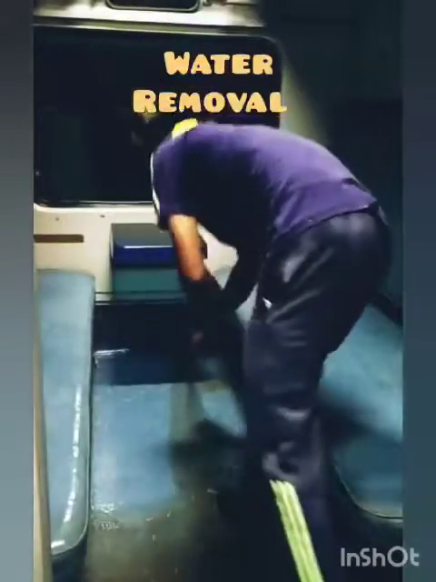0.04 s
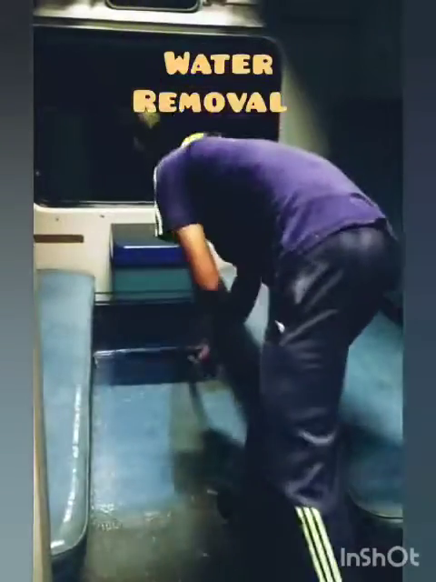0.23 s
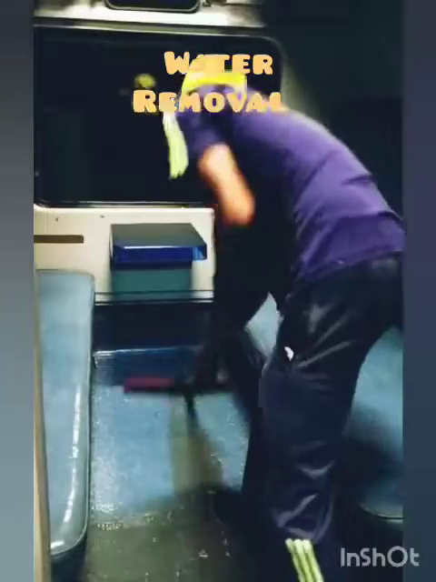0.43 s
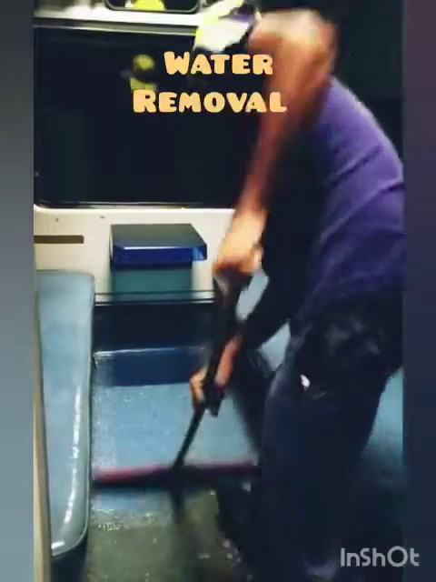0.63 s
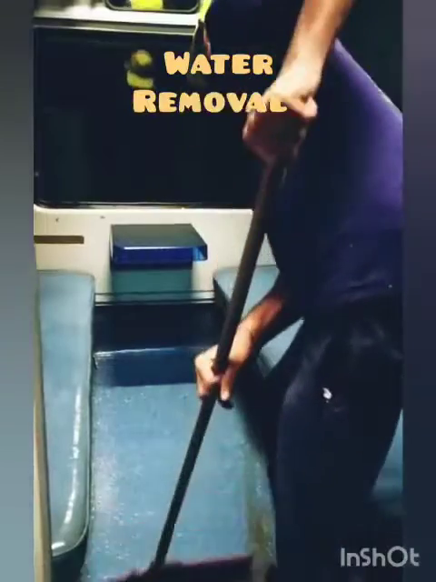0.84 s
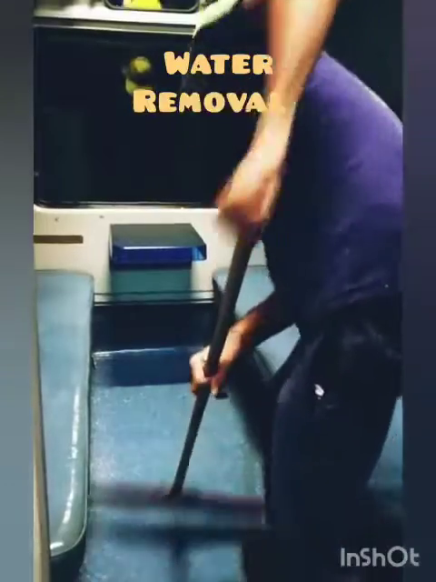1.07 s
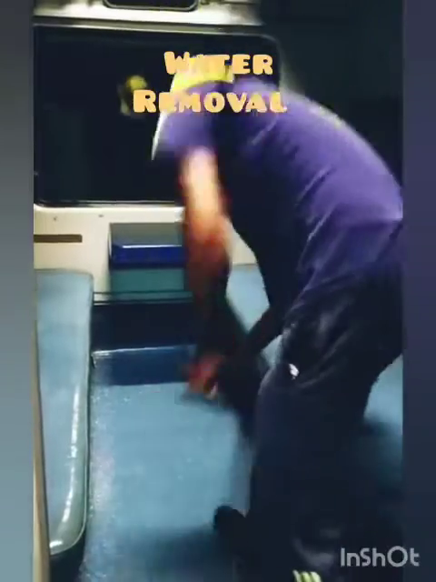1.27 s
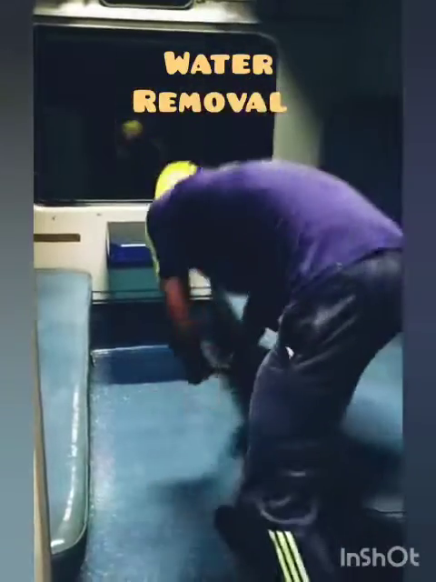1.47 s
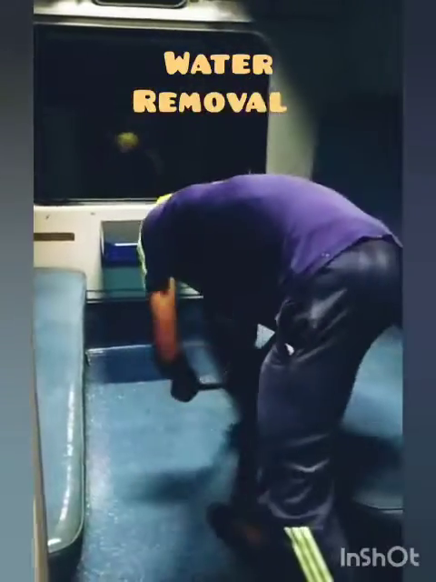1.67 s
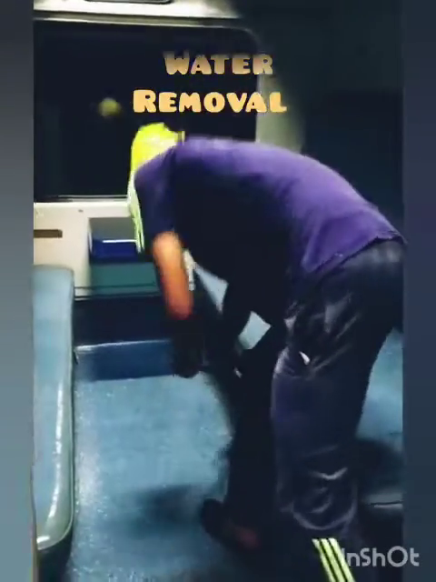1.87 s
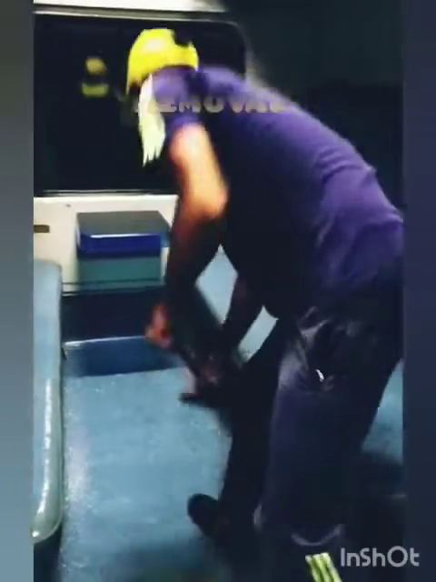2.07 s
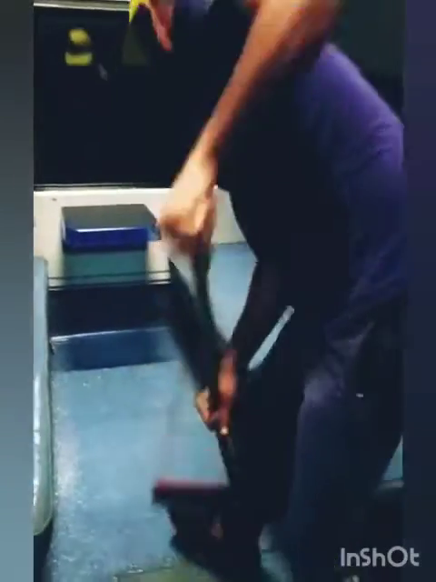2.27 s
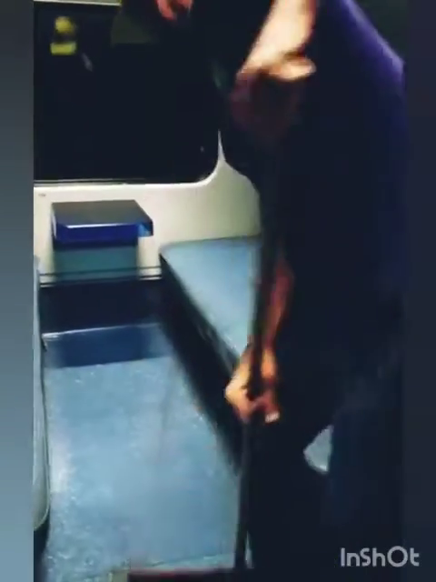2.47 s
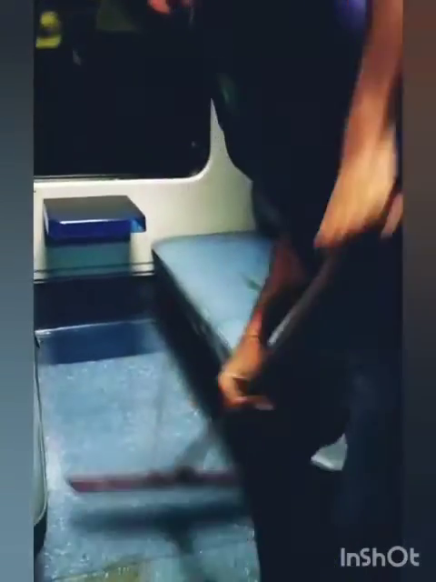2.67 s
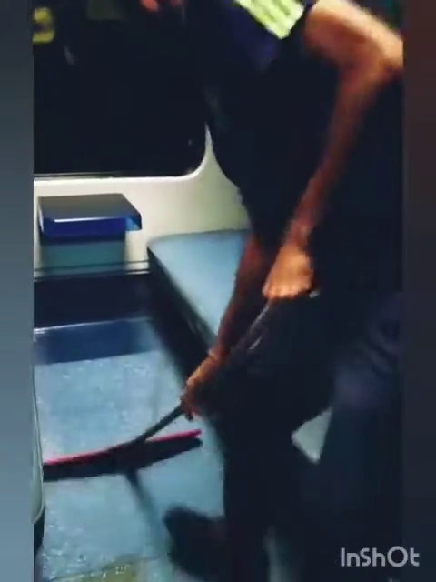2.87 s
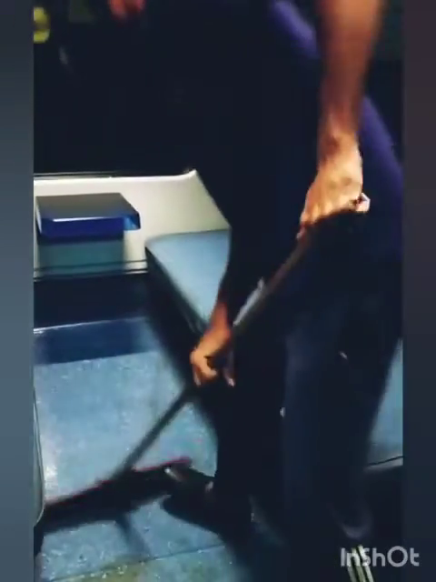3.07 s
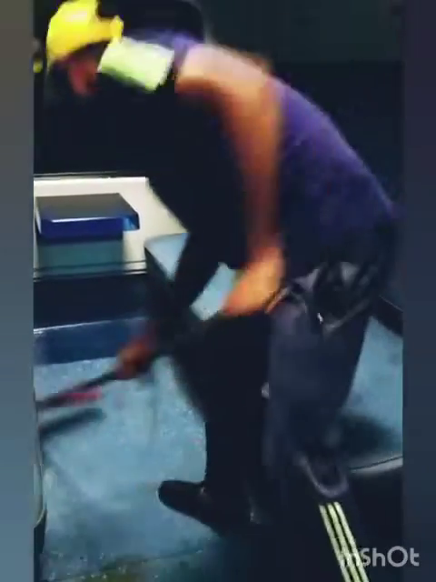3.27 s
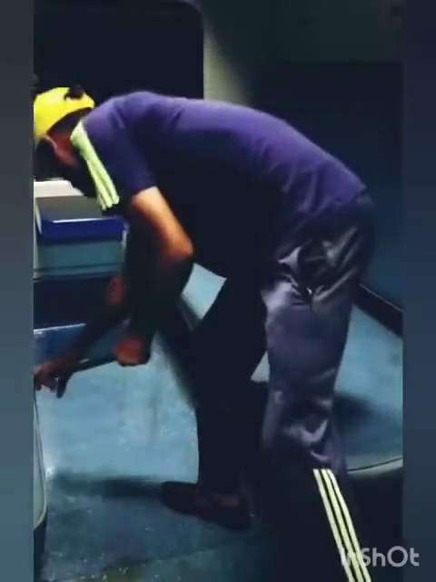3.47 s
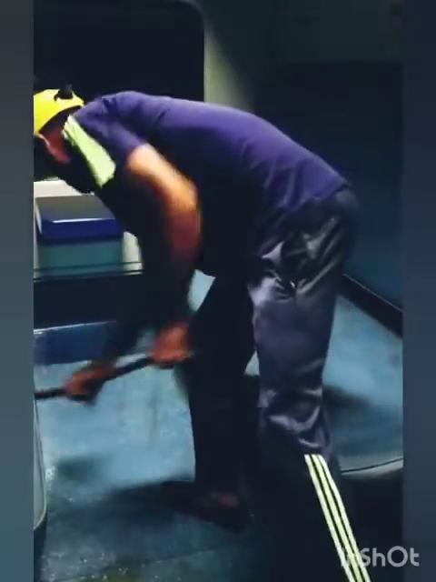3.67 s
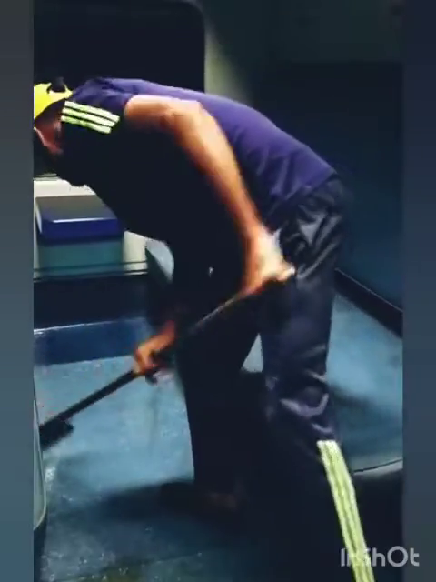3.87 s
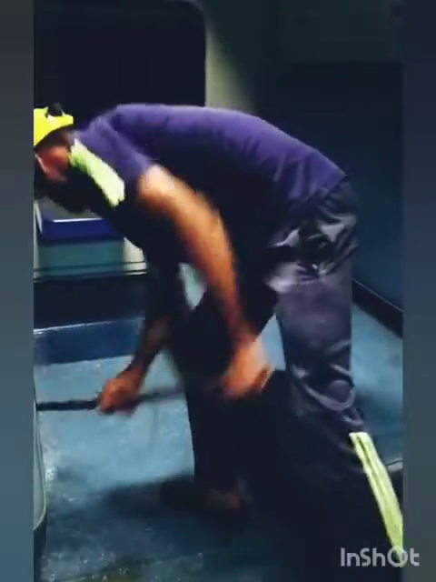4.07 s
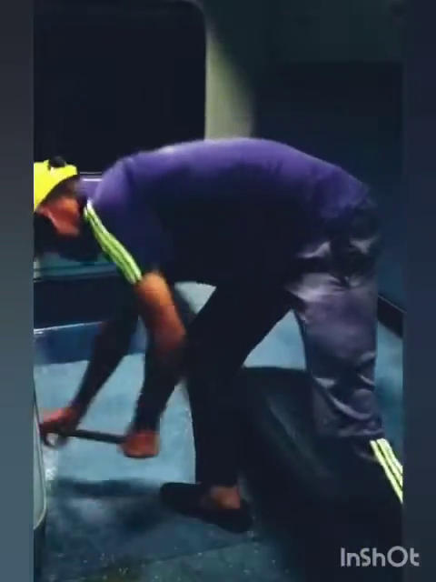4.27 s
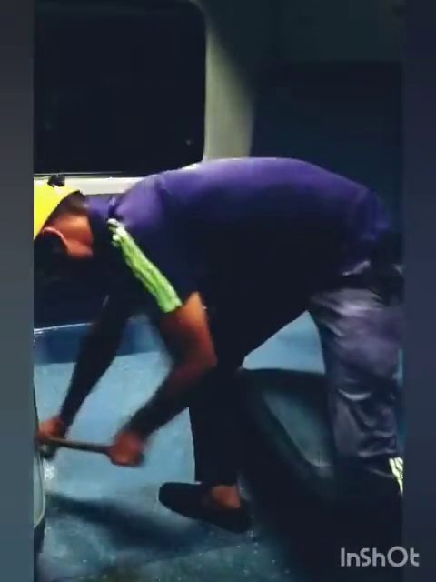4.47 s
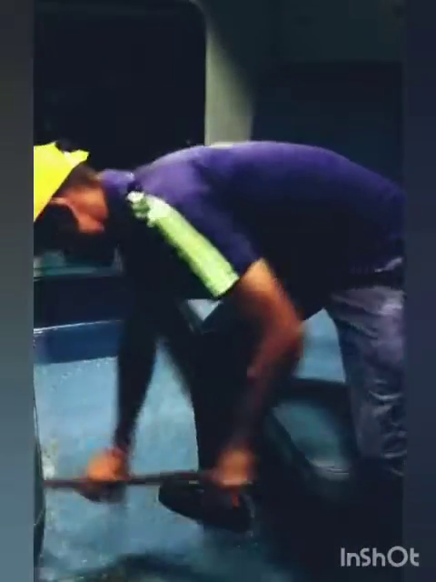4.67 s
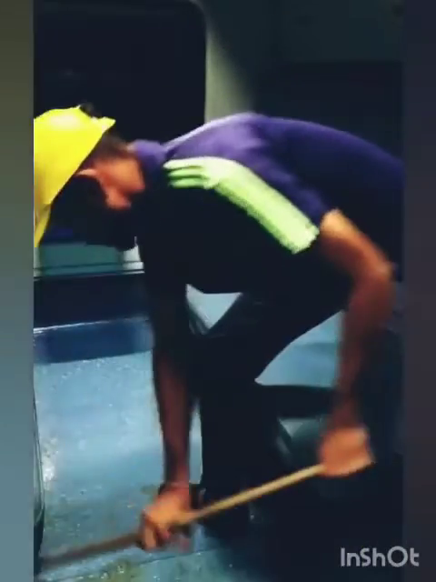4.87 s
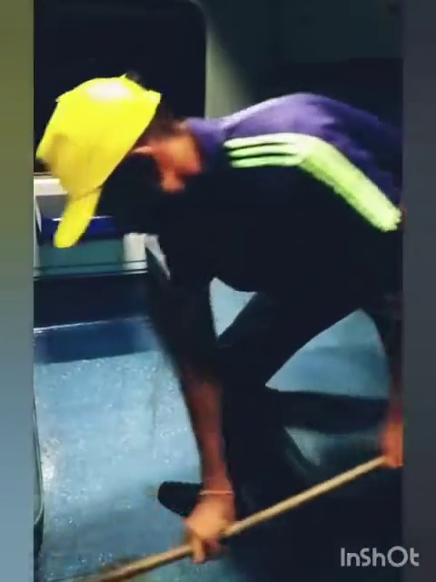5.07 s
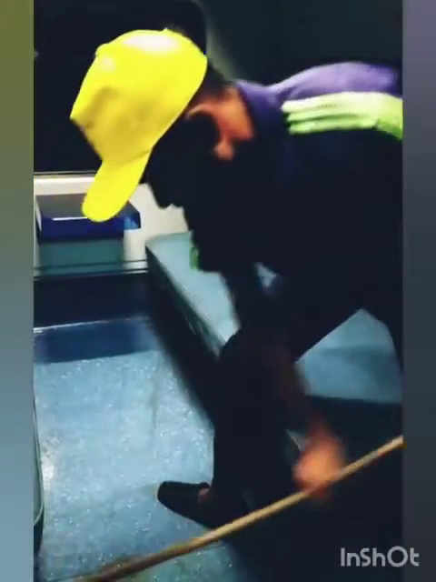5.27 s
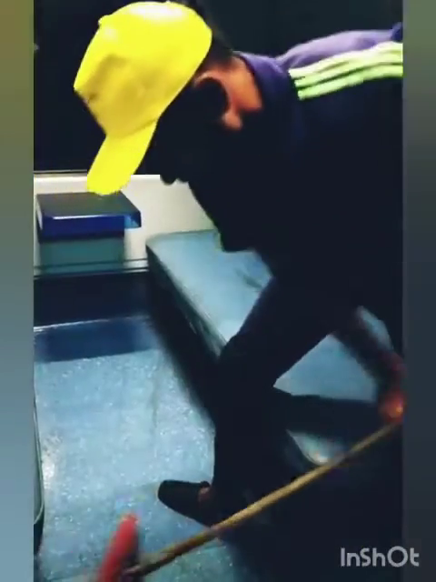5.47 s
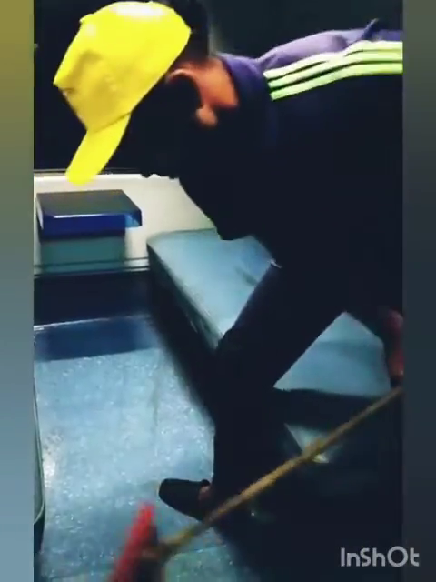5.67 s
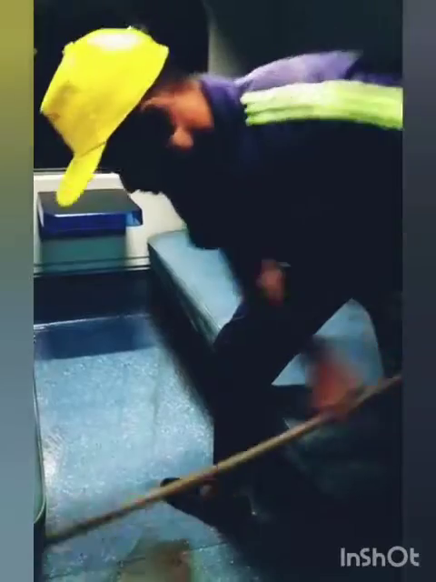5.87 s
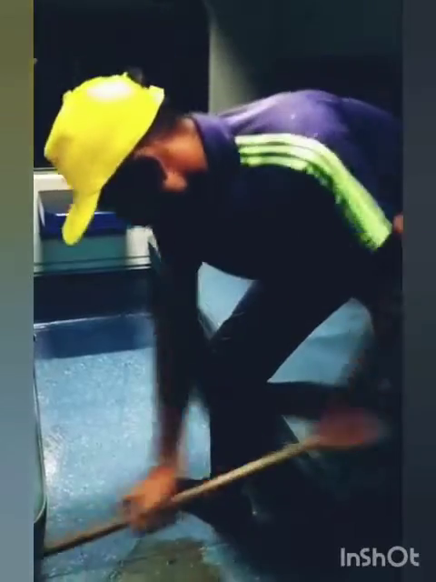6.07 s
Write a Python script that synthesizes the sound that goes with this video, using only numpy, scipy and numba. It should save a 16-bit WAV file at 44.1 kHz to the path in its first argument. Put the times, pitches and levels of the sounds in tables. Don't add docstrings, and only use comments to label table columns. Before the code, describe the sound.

Close up in a train coach, a wide wiper works over a wet floor, above faint fans and distant yard noise. A light clack and slap open it, then hissing, raspy strokes run from 0.3 to 0.9 s with a bright splash and low groans at 0.5 to 0.9. Small bumps at 1.2 to 1.3 lead to a hard double knock at 1.5, then wet drags until 2.5, faintly groaning. A sharp rattling clack comes at 2.85, with lighter bumps to 3.5. A dragged stroke at 3.5 to 3.9 sings with a thin metallic squeal. After a lull, a knock at 4.27 starts more scraping; the heaviest slam lands at 5.0, followed by strong swishes. Knocks and a broad splash hit at 5.5, tiny drips at 5.85, and spray rises at the 6.1 cutoff. Short room echo; right side bright, left dull.

```python
import sys
import numpy as np
from scipy import signal
from scipy.fft import rfft, irfft, next_fast_len
from scipy.io import wavfile
from scipy.ndimage import uniform_filter1d
from numba import njit

SR = 44100
rng = np.random.default_rng(int(sys.argv[2]) if len(sys.argv) > 2 else 0)


def magnitude_from_level(level_db):
    exponent = np.asarray(level_db, float) / 20
    return 10 ** exponent


def pcm_store(signal):
    levels = np.round(np.clip(np.atleast_2d(signal), -1, 1) * 32767)
    wavfile.write(sys.argv[1], SR, levels.astype(np.int16).T)


N = 269451
T = np.arange(N) / SR
STEP = 16

# f/Hz, density/dB
COACH_TONE = [(15, -84), (25, -54), (80, -13), (97, -22.5), (180, -4.5), (277, -16.5), (373, -15),
              (531, -7), (575, -24.5), (641, -6.5), (695, -20.5), (1230, -24.5), (8360, -24),
              (10400, -21.5), (16000, -25)]
# f/Hz, left minus right/dB
HAND_SHADE = [(60, 7), (110, -14), (200, -7.5), (380, -9.5), (700, -6.5), (1290, -9), (2380, -15.5),
              (4400, -14.5), (8120, -26), (15000, -17)]
# t/s, hold/s, hiss level/dB, bend resonance f/Hz, rasp over hiss/dB
PUSHES = [(.001, 0.017, -43.5, 6000, -32), (0.298, .26, -33, 7000, -12.5), (0.63, 0.2, -35, 8300, -8.5),
          (0.81, 0.11, -38.5, 7500, -14.5), (1.508, .01, -40, 7240, -3), (1.564, 0.033, -28.5, 4800, -8),
          (1.819, 0.12, -32, 6200, -15.5), (2.047, .16, -31, 6360, -10), (2.273, .05, -35.5, 7560, -6.5),
          (2.387, .13, -36, 7800, -13), (2.928, 0.025, -39.5, 6000, -4), (3.035, 0.016, -41.5, 6850, -16),
          (3.456, .01, -52, 6300, -4), (3.527, 0.013, -29.5, 6500, -5), (3.621, 0.11, -29, 6300, -10),
          (3.761, 0.082, -36, 6500, -6), (4.502, 0.03, -34.5, 6550, -12), (4.581, 0.053, -31, 6100, -22),
          (4.684, 0.18, -32, 7600, -13.5), (4.948, 0.036, -36, 8400, -9), (5.075, 0.083, -22.5, 4100, -8),
          (5.207, 0.09, -28.5, 4730, -8.5), (5.329, .13, -27, 5900, -10), (5.846, .02, -60, 8500, -23),
          (6.10, .02, -54, 6770, -24)]
# t/s, hiss level/dB, fade/(dB/s), bend f/Hz, rasp level/dB
SLAPS = [(0.049, -26.5, 81, 4730, -30.5), (.062, -44, 116, 4500, -26.5), (1.212, -43, 171, 5600, -49.5),
         (1.278, -29, 136, 5700, -48), (1.502, -17, 219, 6100, -14), (2.846, -33.5, 93, 5500, -50),
         (3.128, -48, 44, 4900, -46), (3.227, -31, 146, 7800, -36.5), (3.47, -41, 42, 6100, -31),
         (4.245, -41.5, 500, 4350, -41.5), (4.274, -25.5, 87, 4500, -28), (4.998, -7.5, 110, 3850, -13.5),
         (5.465, -25.5, 89, 6000, -29)]
# t/s, hold/s, drumming level/dB
FLOOR_LOADS = [(0.348, .02, -49), (.55, 0.023, -48), (0.89, 0.016, -39.5), (1.165, 0.014, -44),
               (1.3, 0.014, -42), (1.48, .01, -43), (1.556, 0.058, -41), (2.2, 0.29, -47),
               (2.834, .01, -50), (3.153, 0.021, -38), (3.242, .01, -37.5), (3.465, .01, -38),
               (3.61, 0.13, -46), (3.95, .02, -40), (4.233, .02, -40), (4.55, 0.28, -50),
               (5.203, 0.039, -39), (5.26, 0.034, -29.5), (5.51, 0.033, -31.5)]
# f/Hz, density/dB
HISS_TONE = [(880, -22), (1500, 6.5), (1960, 5), (2440, 6), (4330, -1.5), (6240, -10), (8740, 3),
             (14100, -0.5), (15100, -1.5), (16000, -35)]
# f/Hz, density/dB
RASP_TONE = [(180, -58), (300, -21), (461, 1.5), (516, 1.5), (800, -0.5), (1430, 4.5), (1660, -2),
             (1910, -4.5), (2800, -1), (3640, -6), (6160, -120)]
# f/Hz, width/Hz, level/dB
FLOOR_MODES = [(180, 49, -20), (232.5, 39.5, 11), (251, 117, 6.5)]
# t/s, peak level/dB, ring f/Hz, rattle/s
FRAME_CLACKS = [(.045, -28.5, 580, 0.014), (.059, -15, 875, 0.0099), (.139, -36, 990, .012),
                (0.918, -41.5, 1160, 0.013), (1.507, -4.5, 562, 0.0075), (2.382, -24.5, 576, 0.012),
                (2.408, -29, 633, 0.0048), (2.8445, -6.5, 716, 0.0032), (2.862, -14.5, 1050, .004),
                (2.884, -18, 520, 0.0046), (2.905, -22, 1106, 0.011), (2.918, -31, 1005, 0.0093),
                (4.289, -22, 535, .01), (4.419, -33.5, 487, 0.0089), (4.647, -35.5, 435, 0.022),
                (5.009, -8, 493, .012), (5.023, -9.5, 474, 0.011), (5.484, -23, 1140, .004),
                (5.508, -20, 550, 0.009), (5.519, -19.5, 996, 0.025), (6.105, -43, 880, .014)]
# t/s, peak level/dB, ring f/Hz, thud over ring/dB
FLOOR_BUMPS = [(.066, -20.5, 1200, -13), (.351, -34.5, 530, 5), (.369, -33.5, 347, -7),
               (0.543, -30, 666, -7.5), (1.197, -33.5, 592, -2), (1.303, -30.5, 566, -8),
               (1.475, -35, 506, -5), (1.498, -3.5, 650, -14), (1.544, -13, 1207, -15),
               (1.905, -37.5, 1250, 1), (3.124, -25, 560, -9.5), (3.223, -35, 1120, -6.5),
               (3.471, -18, 640, -11.5), (3.519, -27, 654, -14), (4.245, -31, 453, -8),
               (4.267, -12, 408, -17), (4.994, 2, 506, -7.5), (5.464, -17.5, 1264, -9.5),
               (5.744, -51, 465, 5)]
# multiple of ring f, t60/s, level/dB
HEAD_MODES = [(.7, 0.011, -2), (0.998, 0.016, 5.5), (1.45, 0.0073, 2.5), (2.1, 0.014, -7),
              (3.2, 0.011, -15.5), (5, 0.002, -1)]
# f/Hz, t60/s, level/dB
ROOM_BANDS = [(209, 0.3, -3.5), (498, 0.23, 1.5), (1150, 0.32, 6), (2450, 0.21, 10), (6000, 0.11, -5)]
# t/s, hold/s, level/dB, resonance f/Hz
GROANS = [
    (0.536, 0.042, -40.5, 640),
    (0.659, 0.013, -37.5, 640),
    (0.75, .18, -44, 528),
    (2.007, 0.15, -46.5, 670),
    (2.212, 0.16, -42, 573),
    (2.34, 0.022, -37, 620),
    (2.49, .01, -56, 570),
    (2.99, 0.062, -47, 620),
    (4.656, 0.019, -38.5, 526),
    (4.728, 0.071, -41.5, 537),
]
# t/s, peak level/dB, centre f/Hz, fizz/s, width over centre
DRIPS = [
    (0.539, -14, 9000, 0.005, 1.4),
    (3.631, -28.5, 6600, .004, .6),
    (4.247, -37, 3000, 0.0028, 1.3),
    (5.465, -8.5, 4300, .004, 3.3),
    (5.83, -31, 10000, 0.0019, 0.54),
    (5.842, -30, 9900, 0.0032, 0.3),
    (5.857, -36, 10500, 0.0033, 0.4),
    (5.868, -33, 9550, 0.012, 0.33),
]
# t/s, peak level/dB, rise/s
LANDING = (6.1092, -13, .0011)
# t/s, level/dB
SING_LEVEL = [
    (3.5, -58),
    (3.54, -34),
    (3.62, -37.5),
    (3.635, -31),
    (3.665, -35.5),
    (3.72, -36),
    (3.81, -37.5),
    (3.83, -47),
    (3.9, -65),
]
# f/Hz, width/Hz, level/dB
HOLDER_MODES = [(2760, 60, -6.5), (4500, 41, -5), (6500, 650, 5.5), (7310, 290, 2.5), (7600, 420, 1),
                (10700, 520, -17), (12240, 240, -2), (12600, 300, -7)]
# margin/dB, scatter/dB
THINNING = (22, 14)

FACING_DB = -13.5


def unit(x):
    return x / np.sqrt(np.mean(x ** 2))


def colour(x, table):
    hz, db = np.transpose(table)
    size = next_fast_len(N + SR)
    log_hz = np.log(np.arange(size // 2 + 1) * SR / size + 1)
    gain = magnitude_from_level(np.interp(log_hz, np.log(hz), db))
    return irfft(rfft(x, size) * gain, size)[..., :N]


@njit
def svf(x, hz, width):
    y, b, l = np.empty(len(x)), 0., 0.
    for i in range(len(x)):
        g, k = np.tan(np.pi * hz[i] / SR), width[i] / hz[i]
        v = (b + g * (x[i] - l)) / (1 + g * (g + k))
        b, l, y[i] = 2 * v - b, l + 2 * g * v, k * v
    return y


def band(x, hz, width):
    return svf(x, hz + 0 * T, width + 0 * T)


def walk(rate):
    k = int(SR / rate)
    held = np.repeat(rng.standard_normal(N // k + 1), k)
    return 1.06 * uniform_filter1d(uniform_filter1d(held, k), k)[:N]


def ports(right, left, pan_db):
    share = magnitude_from_level(pan_db)
    return np.array([share * left, right]) * 2 / np.sqrt(1 + share ** 2)


def coach():
    right = rng.standard_normal(N)
    left = colour(rng.standard_normal(N), HAND_SHADE) + 0.19 * band(right, 220, 460)
    both = colour(np.array([left, right]), COACH_TONE)
    swell = magnitude_from_level(0.66 * walk(2.4))
    return magnitude_from_level(-51) * swell * both / np.sqrt(np.mean(both[1] ** 2))


def below(s, hold_s, rise, fall):
    s, hold_s, fall = (np.reshape(v, (-1, 1)) for v in (s, hold_s, fall))
    t = T[::STEP]
    return -rise * np.maximum(s - t, 0) - fall * np.maximum(t - s - hold_s, 0)


def blend(db, hz, rest_db):
    power = magnitude_from_level(2 * np.maximum(db, -150))
    total_db = 10 * np.log10(power.sum(0) + magnitude_from_level(2 * rest_db))
    mean_hz = hz @ power / power.sum(0)
    return np.interp(T, T[::STEP], total_db), np.interp(T, T[::STEP], mean_hz)


def motion():
    s, hold_s, db, hz, rasp_db = np.transpose(PUSHES)
    push = below(s, hold_s, rise=186, fall=90.5)
    at, slap_db, fade, slap_hz, slap_rasp_db = np.transpose(SLAPS)
    slap = below(at, 0, rise=5000, fall=fade)
    both_hz = np.r_[hz, slap_hz]
    hiss = np.r_[db[:, None] + push, slap_db[:, None] + slap]
    hiss_db, bend_hz = blend(hiss, both_hz, rest_db=-61)
    push_rasp = (db + rasp_db)[:, None] + 1.53 * push
    slap_rasp = slap_rasp_db[:, None] + 1.7 * slap
    total_rasp_db = blend(np.r_[push_rasp, slap_rasp], both_hz, rest_db=-73)[0]
    s, hold_s, db = np.transpose(FLOOR_LOADS)
    load = db[:, None] + below(s, hold_s, rise=178, fall=178)
    drum_db = blend(load, s, rest_db=-50)[0]
    return hiss_db, bend_hz, total_rasp_db, drum_db


def patchy(x, depth_db):
    z = signal.stft(x, nperseg=1024)[2]
    spots = uniform_filter1d(rng.standard_normal(z.shape), size=5, axis=0)
    spots = uniform_filter1d(spots, size=3, axis=1)
    return unit(signal.istft(z * magnitude_from_level(depth_db * unit(spots)), nperseg=1024)[1][:N])


def slips(spread_db, flicker_db):
    jerks = rng.standard_normal(N) * magnitude_from_level(spread_db * rng.exponential(size=N))
    return patchy(jerks * magnitude_from_level(flicker_db * walk(60)), depth_db=2.2)


def drumming(shake):
    return unit(sum(magnitude_from_level(db) * band(band(shake, hz, w), hz, 2 * w) for hz, w, db in FLOOR_MODES))


def wiping():
    hiss_db, bend_hz, rasp_db, drum_db = motion()
    bend_hz = np.clip(bend_hz, 2000, 12000)
    sides = []
    for _ in range(2):
        jerks = slips(spread_db=1.0, flicker_db=-0.5)
        bend = unit(svf(jerks, bend_hz, 1.12 * bend_hz))
        sides.append(unit(unit(colour(jerks, HISS_TONE)) + magnitude_from_level(8.0) * bend))
    shaded = colour(sides[1], [(hz, db + 16.5) for hz, db in HAND_SHADE])
    hiss = ports(sides[0], shaded, FACING_DB - 4) * magnitude_from_level(hiss_db)

    near, far = (unit(colour(slips(spread_db=2.5, flicker_db=1.0), RASP_TONE)) for _ in range(2))
    rasp = ports(near, unit(far + 0.12 * near), FACING_DB + 1) * magnitude_from_level(rasp_db)

    shake, other = (rng.standard_normal(N) * magnitude_from_level(4.7 * walk(24.75)) for _ in range(2))
    near, far = drumming(shake), drumming(other)
    drum = np.array([magnitude_from_level(-17.5) * unit(near + 0.67 * far), magnitude_from_level(-3.5) * near]) * magnitude_from_level(drum_db)
    return hiss + rasp + drum


def echoes():
    right, other = rng.standard_normal((2, N))
    stock = []
    for hz, t60, db in ROOM_BANDS:
        differ = np.clip(hz / 1300, 0, 1)
        left = np.sqrt(1 - differ ** 2) * right + differ * other
        level = magnitude_from_level(db) * np.sqrt(1000 / hz)
        stock.append([level * band(band(v, hz, hz), hz, 2.5 * hz) for v in (left, right)])
    return np.array(stock)


def room(x, stock, start):
    t = T[:SR // 2]
    tails = 0
    for pair, (hz, t60, db) in zip(stock, ROOM_BANDS):
        tails = tails + pair[:, start:start + len(t)] * magnitude_from_level(-60 * t / t60)
    tails = tails * np.minimum(t / 0.00043, 1)
    return signal.fftconvolve(x, tails / np.sqrt(np.sum(tails[1] ** 2)), axes=1)


def knocks():
    out, t, stock = np.zeros((2, N + SR)), T[:SR // 4], echoes()
    clacks = [(s, db, hz, -51, rattle_s) for s, db, hz, rattle_s in FRAME_CLACKS]
    bumps = [(*row, 0.01) for row in FLOOR_BUMPS]
    blows = sorted(clacks + bumps)
    chance = rng.standard_normal((len(blows), 2, 3000))
    for n, (s, db, ring_hz, thud_db, rattle_s) in enumerate(blows):
        size, odds = chance[n]
        rattle = np.exp(-t[:3000] / np.clip(rattle_s, .002, .016))
        push = .4 * size * (np.abs(odds) > 2.4) * rattle
        push[0] = 1
        push = np.convolve(push, np.hanning(int(SR * 0.00029)))

        ring = 0
        for k, t60, g in HEAD_MODES:
            mode_db = g + 0.19 * (db + 30.5) * np.log2(k)
            ring = ring + magnitude_from_level(mode_db) * np.sin(2 * np.pi * k * ring_hz * t) * magnitude_from_level(-60 * t / t60)
        ring = ring * (1 - np.exp(-t * ring_hz / 0.72))

        thud = 0
        for k, (hz, w, g) in enumerate(FLOOR_MODES):
            spot_hz = hz * (1 + 0.054 * odds[k])
            thud = thud + magnitude_from_level(g) * np.sin(2 * np.pi * spot_hz * t) * np.exp(-np.pi * .6 * w * t)

        ring, thud = (signal.fftconvolve(x, push)[:len(t)] for x in (ring, thud))
        ring = ring / np.abs(ring).max() * magnitude_from_level(np.array([[-6], [6]]))
        thud = magnitude_from_level(thud_db) * thud / np.abs(thud).max() * magnitude_from_level(np.array([[-6], [3]]))
        blow = magnitude_from_level(db - 2.5) * (ring + thud)
        tail = magnitude_from_level(-4) * room(blow, stock, start=4321 * n)
        i = int((s + .001) * SR)
        out[:, i:i + len(t)] += blow
        out[:, i:i + tail.shape[1]] += tail
    out[0] = np.roll(out[0], 8)
    return out[:, :N]


def groaning():
    s, hold_s, db, hz = np.transpose(GROANS)
    db, hz = blend(db[:, None] + below(s, hold_s, rise=500, fall=260), hz, rest_db=-90)
    ring = unit(svf(svf(slips(spread_db=4, flicker_db=3), hz, .4 * hz), hz, .6 * hz))
    return ports(ring, np.roll(ring, 8), -16.5) * magnitude_from_level(db - 3.5)


def drips():
    noise = rng.standard_normal(N)
    s, db, rise_s = LANDING
    out = magnitude_from_level(db) * np.exp(np.minimum(T - s, 0) / rise_s) * unit(band(noise, 14000, 13000))
    for s, db, hz, fizz_s, share in DRIPS:
        fizz = (T > s) * np.exp(-np.abs(T - s) / fizz_s)
        out = out + magnitude_from_level(db - 10) * fizz * unit(band(noise, hz, share * hz))
    return ports(out, np.roll(out, 12), -22.5)


def singing():
    jerks = rng.standard_normal(N) * magnitude_from_level(2.7 * walk(70))
    ring = 0
    for hz, w, db in HOLDER_MODES:
        ring = ring + magnitude_from_level(db + 1.2 * walk(29.3)) * unit(band(band(jerks, hz, w), hz, 2 * w))
    level_db = np.interp(T, *np.transpose(SING_LEVEL), left=-120, right=-120)
    return ports(ring, np.roll(ring, 300), -19) * magnitude_from_level(level_db)


def scene():
    return coach() + wiping() + knocks() + groaning() + drips() + singing()


def limit(x):
    limit_db, recover_db_s = -3, 55.5
    over_db = np.maximum(20 * np.log10(np.abs(x) + 1e-9) - limit_db, 0)
    cut_db = np.maximum.accumulate(over_db + recover_db_s * T, axis=1) - recover_db_s * T
    return x * magnitude_from_level(-uniform_filter1d(cut_db, size=101, axis=1))


def thin_out(x):
    hz, _, z = signal.stft(x, SR, nperseg=1024, noverlap=768)
    power = np.abs(z) ** 2 + 1e-20
    here = uniform_filter1d(uniform_filter1d(power, size=7, axis=1), size=5, axis=2)
    around = uniform_filter1d(here.max(axis=0), size=41, axis=0)
    luck = uniform_filter1d(rng.standard_normal(z.shape), size=8, axis=1)
    luck = uniform_filter1d(luck, size=11, axis=2)
    margin_db, scatter_db = THINNING
    weak = 10 * np.log10(here / around) + margin_db + scatter_db * unit(luck) < 0
    shut = weak & (hz[:, None] > 2600)
    return signal.istft(z * ~shut, SR, nperseg=1024, noverlap=768)[1][:, :N]


def band_limit(x):
    return signal.sosfilt(signal.butter(12, 16480, fs=SR, output="sos"), x)


def record(dry):
    bass_cut = signal.butter(2, 140, "high", fs=SR, output="sos")
    top_cut = signal.ellip(12, .2, 100, 15900, fs=SR, output="sos")
    rounded = np.tanh(limit(signal.sosfilt(bass_cut, dry)))
    mix = thin_out(signal.sosfilt(top_cut, rounded))
    return band_limit(mix)


dry = scene()
out = record(dry)
pcm_store(out)
```